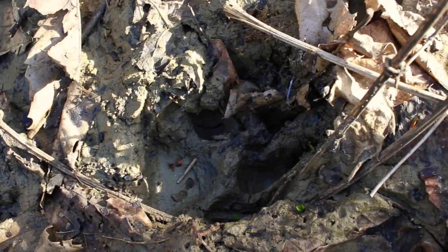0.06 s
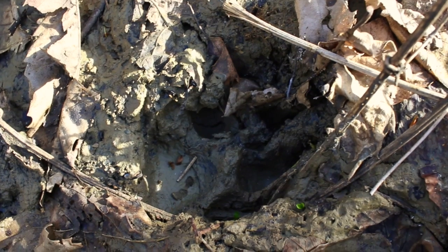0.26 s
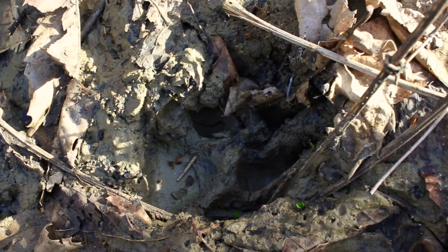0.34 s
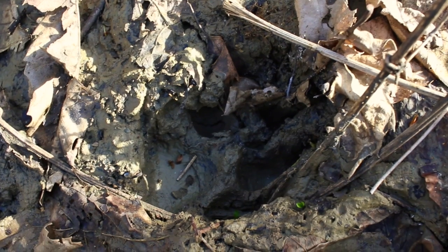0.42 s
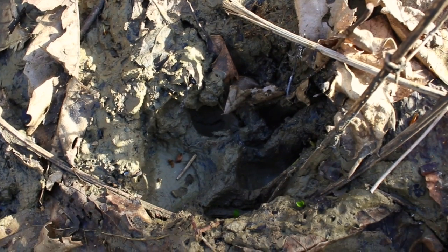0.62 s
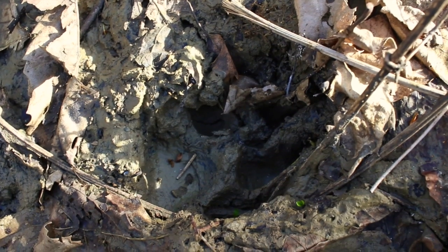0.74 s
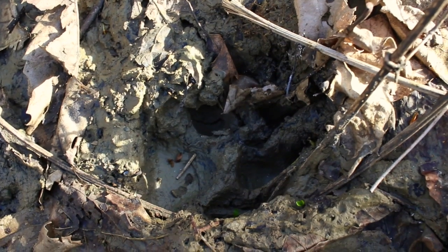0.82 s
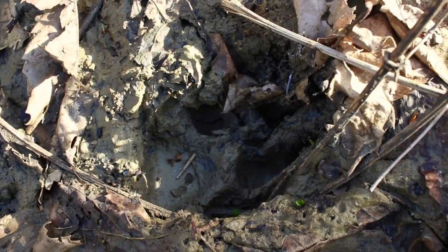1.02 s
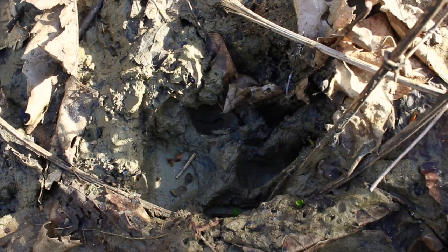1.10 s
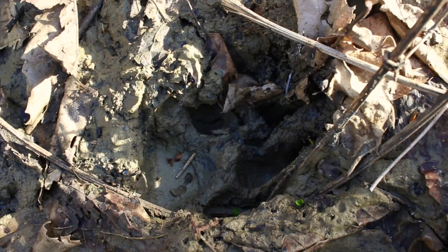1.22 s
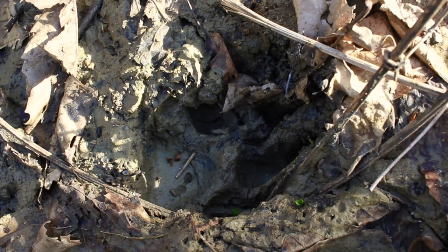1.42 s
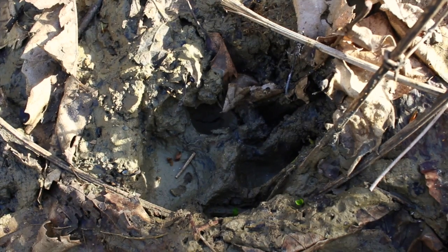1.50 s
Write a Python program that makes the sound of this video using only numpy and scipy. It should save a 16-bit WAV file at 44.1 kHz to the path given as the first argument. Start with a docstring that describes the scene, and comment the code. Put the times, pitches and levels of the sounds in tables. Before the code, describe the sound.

One sharp plop in a wet mud hole, with faint distant bird whistles.

```python
"""A quiet wood in stereo, the microphone close to a wet mud hole; far birds whistle over a soft hush.
At 0.23 s comes one sharp plop: the air in the hollow rings near 1 kHz, bounces off the walls and briefly
overloads the recorder, then leaves and trunks scatter it. A tiny wet tick follows on the right at 0.52 s,
then a soft dull blip at 0.63 s and two more around 1.3 s, just before the loudest of the whistles."""
import sys
import numpy as np
from scipy import signal
from scipy.fft import rfft, irfft
from scipy.io import wavfile

SR = 44100
rng = np.random.default_rng(int(sys.argv[2]) if len(sys.argv) > 2 else 0)


def log_audio(samples):
    """Write samples as a 16-bit WAV file to the path given in sys.argv[1]."""
    # one column per channel
    frames = np.atleast_2d(samples).T
    # limit to full scale, then quantise
    limited = np.clip(frames, -1, 1)
    pcm = np.round(limited * 32767).astype(np.int16)
    wavfile.write(sys.argv[1], SR, pcm)


N = 68355
PLOP_S = 0.2308

# Pan is left minus right throughout.
# air modes of the mud hollow: f/Hz, relative level/dB, t60/s, pan/dB
HOLLOW_MODES = [(712, -7, .0212, 4), (1001, 1.5, .016, 13.5), (1035, -7, .0527, -3.5),
                (1133.6, 4.5, 0.021, -4.5), (1236, -14.5, .0498, -17.5), (1379, -10, 0.024, -11),
                (1830, 3.5, 0.0014, -4.5), (2602, 2, 0.0087, -4), (2847, -7.5, 0.0065, -19),
                (3650, -24, 0.051, -11)]
# close echoes off the walls and the ground: delay/s, relative level/dB, pan/dB
WALL_ECHOES = [(.00204, -11.5, -7), (.00486, -13.5, 4), (.00934, -26.5, 6)]
# the plop scattered by leaves and trunks: centre f/Hz, width/Hz, level/dB, t60/s, pan/dB
SCATTER_BANDS = [(1030, 560, -34, .2, -2.5), (2200, 1500, -39, .15, -7.5), (3000, 760, -45.5, 0.135, -8.5)]
# wet tick, well to the right: t/s, f/Hz, half length/s, level/dB, pan/dB
WET_TICKS = [(0.5235, 3240, 0.0005, -34.5, -24)]
# dull blips, near the centre: t/s, f/Hz, half length/s, level/dB, pan/dB
DULL_BLIPS = [(0.6264, 373, 0.0019, -37.5, 3), (1.2907, 368, 0.0023, -40, 0.5),
              (1.3503, 381, .0022, -36.5, 3)]
# far birds: t/s, length/s, start f/Hz, end f/Hz, level/dB, pan/dB, waver/share of pitch
BIRD_WHISTLES = [(-.03, 0.053, 5500, 5180, -65.5, -1, 0.053), (.078, 0.078, 5000, 5540, -56.5, 2, 0.022),
                 (0.144, 0.079, 5350, 5866, -67, 5, 0.028), (0.245, 0.053, 5500, 5220, -66.5, 0, .025),
                 (0.367, 0.047, 5580, 4690, -65.5, -5, 0.023), (0.687, 0.08, 3357, 3440, -60.5, 12, 0.0302),
                 (.725, 0.041, 2950, 2780, -71.5, -18, 0.0355), (0.842, 0.16, 3920, 4094, -69, 8.5, 0.0148),
                 (1.064, 0.047, 2760, 2810, -68.5, -11, .03), (1.125, 0.053, 2830, 2930, -65.5, -15, 0.03),
                 (1.212, 0.082, 5550, 5050, -72, 0, 0.0323), (1.299, 0.085, 4950, 5000, -68.5, -12, 0.0176),
                 (1.356, .135, 5140, 5690, -66.5, 4, .03), (1.366, 0.093, 2997, 2982, -50, -7.5, 0.0052),
                 (1.405, 0.0514, 3214, 3010, -54.5, -12, 0.0129)]
# spectrum of the hush common to both channels: f/Hz, relative level/dB
HUSH_MID_SPECTRUM = [(18, -54), (30, -24), (167, -4), (346, -2), (552, -2), (1170, -5), (1440, -5.5),
                     (1600, -7), (2840, -9), (3230, -10), (3980, -11), (4310, -12), (11900, -28),
                     (15000, -37)]
# spectrum of the hush that differs between them: f/Hz, relative level/dB
HUSH_SIDE_SPECTRUM = [(18, -62), (30, -25.5), (460, -1), (524, -0.5), (1200, -3.5), (2370, -8), (2840, -9),
                      (3070, -8.5), (3980, -13), (4650, -16), (13200, -35.5), (15000, -39)]


def plop(rise_s=0.00048, gain_db=-0.5, right_lead_s=0.000167):
    """Close up, a sudden push rings the hollow, neighbouring modes in opposite sense; the walls echo it."""
    age = since(PLOP_S)
    modes = sum((-1) ** k * undb(db) * pan(pan_db) * np.sin(2 * np.pi * hz * age) * fade(age, t60)
                for k, (hz, db, t60, pan_db) in enumerate(HOLLOW_MODES))
    ring = modes * (1 - np.exp(-age / rise_s)) * undb(gain_db)
    echoes = sum(undb(db) * pan(pan_db) * delay(ring, late) for late, db, pan_db in WALL_ECHOES)
    left, right = ring + echoes
    return np.array([left, delay(right, -right_lead_s)])


def tree_scatter(build_s=0.0045, far_late_s=0.065, far_spread_s=0.04):
    """Near leaves and trunks give the plop a short diffuse tail; farther trees return a soft swell."""
    age = since(PLOP_S)
    near = sum(undb(db) * pan(pan_db) * band(hz, width) * fade(age, t60)
               for hz, width, db, t60, pan_db in SCATTER_BANDS)
    swell = np.exp(-((age - far_late_s) / far_spread_s) ** 2)
    far = undb(-48) * pan(-4) * band(centre_hz=1150, width_hz=640) * swell
    return (1 - np.exp(-age / build_s)) * (near + far)


def wet_tick(body_hz=1730, body_db=-13.5, echo_s=0.001065, echo_db=-7, tail_db=-15.5):
    """A tiny wet click with a weak lower body, one close echo and a faint tail."""
    out = 0
    for start, hz, half_s, db, pan_db in WET_TICKS:
        age = since(start)
        click = blip(start, hz, half_s, db, pan_db)
        body = blip(start, body_hz, half_s, db + body_db, pan_db / 2)
        echo = undb(echo_db) * delay(click, echo_s)
        tail_shape = np.tanh(age / echo_s) * fade(age, t60=0.057)
        tail = undb(db + tail_db) * pan(pan_db / 2) * band(hz, width_hz=580) * tail_shape
        out = out + click + body + echo + tail
    return out


def blip(peak_s, hz, half_s, db, pan_db):
    """A ring of only a few cycles that swells and dies at once."""
    t = np.arange(N) / SR - peak_s
    return undb(db) * pan(pan_db) * np.cos(2 * np.pi * hz * t) * np.exp(-(t / half_s) ** 2)


def far_birds(waver_hz=170, echo_db=-2, wood_t60_s=0.17):
    """Thin gliding whistles from far off, blurred by echoes from the trees."""
    wobble = noise(lambda hz: np.exp(-(hz / waver_hz) ** 2), channels=1)[0]
    direct = 0
    for start, length, from_hz, to_hz, db, pan_db, waver in BIRD_WHISTLES:
        progress = np.minimum(since(start) / length, 1)
        hz = (from_hz + (to_hz - from_hz) * progress) * (1 + waver * wobble)
        arch = np.abs(np.sin(np.pi * progress)) ** 0.56
        direct = direct + undb(db) * pan(pan_db) * arch * np.sin(2 * np.pi * np.cumsum(hz) / SR)
    trees = rng.standard_normal((2, N)) * fade(since(0), wood_t60_s)
    trees = trees / np.sqrt(np.sum(trees ** 2) / 2)  # unit energy per channel, on average
    return direct + undb(echo_db) * signal.fftconvolve(direct, trees, axes=1)[:, :N]


def wood_hush(mid_db=-62, side_db=-57):
    """Soft air noise all round the microphone, wide because the side outweighs the mid."""
    def coloured(spectrum):
        at_hz, db = np.array(spectrum).T
        return noise(lambda hz: undb(np.interp(np.log(hz), np.log(at_hz), db)), channels=1)
    mid = undb(mid_db) * coloured(HUSH_MID_SPECTRUM)
    side = undb(side_db) * coloured(HUSH_SIDE_SPECTRUM)
    return np.vstack([mid + side, mid - side]) * pan(-1)


def undb(db):
    """Decibels to gain."""
    return 10 ** (np.asarray(db) / 20)


def pan(db):
    """Left and right gains for a level difference."""
    return undb(np.array([[db], [-db]]) / 2)


def since(start):
    """Seconds since a moment, zero before it."""
    return np.maximum(np.arange(N) / SR - start, 0)


def fade(age, t60):
    """Exponential decay by 60 dB in t60 seconds."""
    return np.exp(-np.log(1000) * age / t60)


def delay(x, seconds):
    """The same sound later, or earlier for a negative time."""
    hz = np.arange(N + 1) * SR / (2 * N)
    return irfft(rfft(x, 2 * N) * np.exp(-2j * np.pi * hz * seconds))[..., :N]


def noise(gain_at, channels=2):
    """Unit noise, independent in each channel, shaped by a gain over frequency."""
    hz = np.maximum(np.arange(N // 2 + 1) * SR / N, 1)
    x = irfft(rfft(rng.standard_normal((channels, N))) * gain_at(hz), N)
    return x / x.std()


def band(centre_hz, width_hz):
    """Stereo noise in one broad resonance with steep skirts."""
    return noise(lambda hz: 1 / (1 + ((hz - centre_hz ** 2 / hz) / width_hz) ** 4))


def scene():
    """Everything at the microphone, from the close mud hole out to the wood."""
    blips = sum(blip(*row) for row in DULL_BLIPS)
    return plop() + tree_scatter() + wet_tick() + blips + far_birds() + wood_hush()


def record(dry, hardness=20, top_hz=16000):
    """The overloaded recorder flattens the plop's peaks; its low-pass cuts the top."""
    clipped = dry / (1 + np.abs(dry) ** hardness) ** (1 / hardness)
    low_pass = signal.ellip(8, rp=0.05, rs=60, Wn=top_hz, fs=SR, output="sos")
    return signal.sosfiltfilt(low_pass, clipped)


dry = scene()
out = record(dry)
log_audio(out)
```